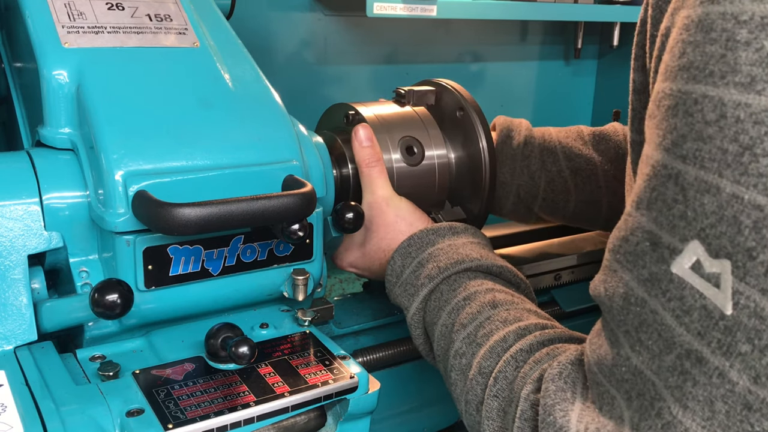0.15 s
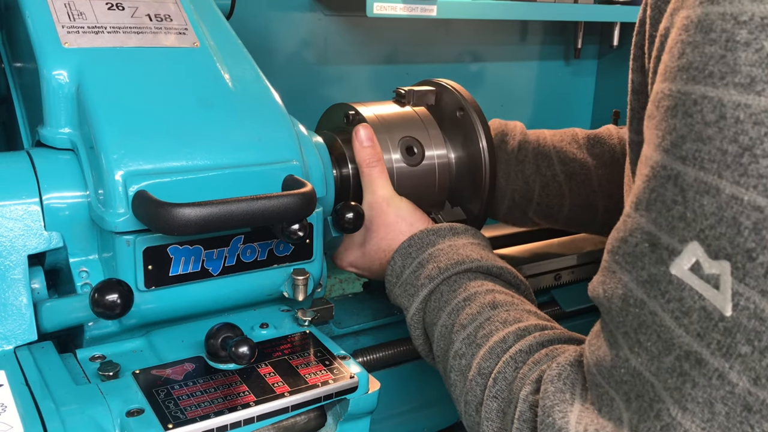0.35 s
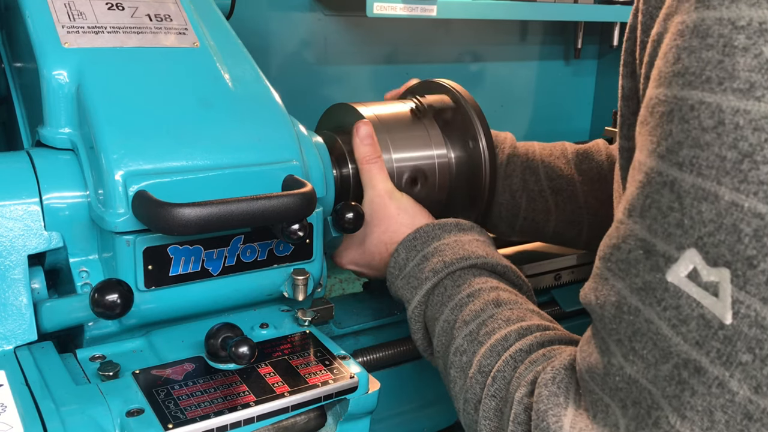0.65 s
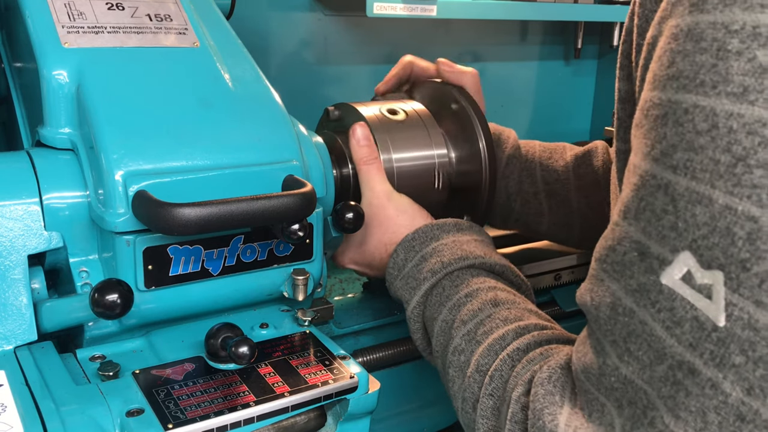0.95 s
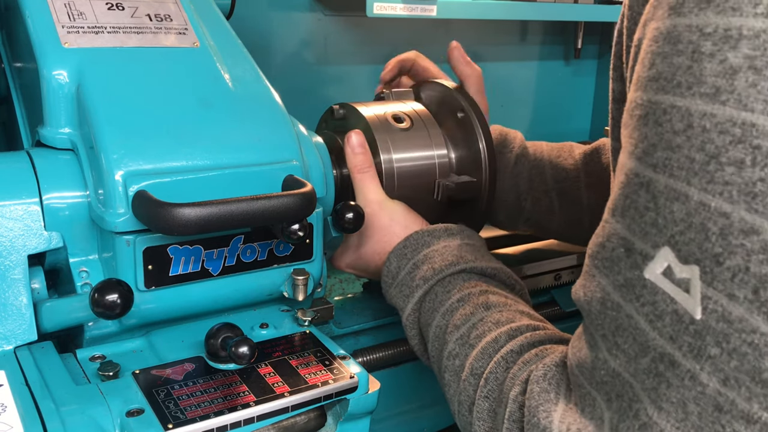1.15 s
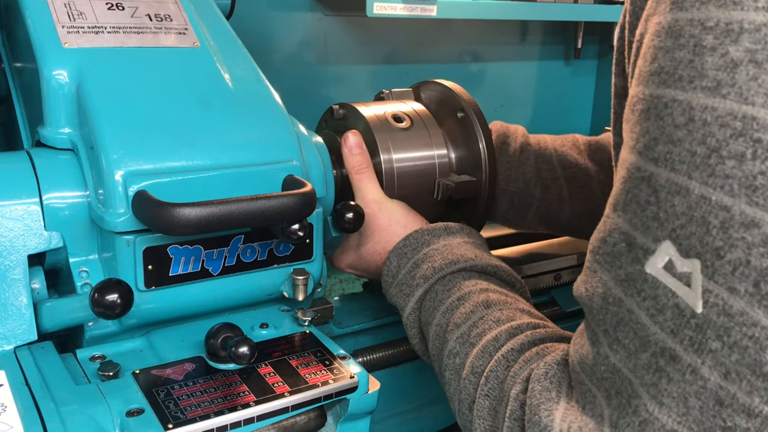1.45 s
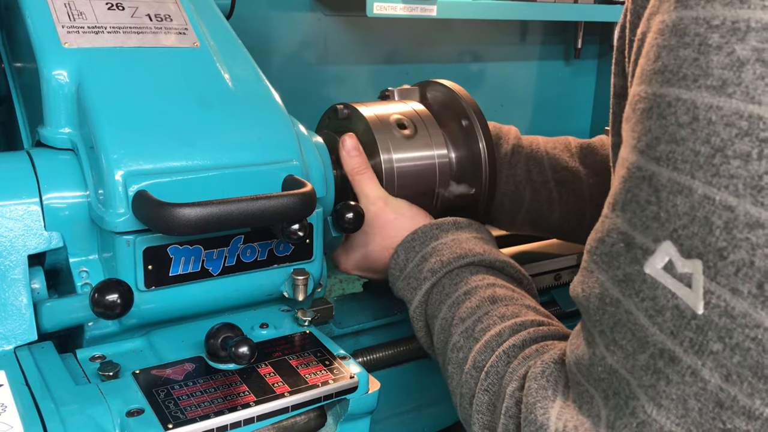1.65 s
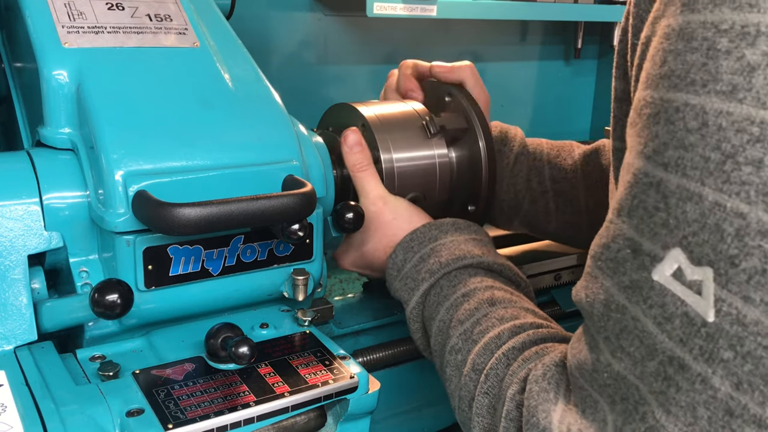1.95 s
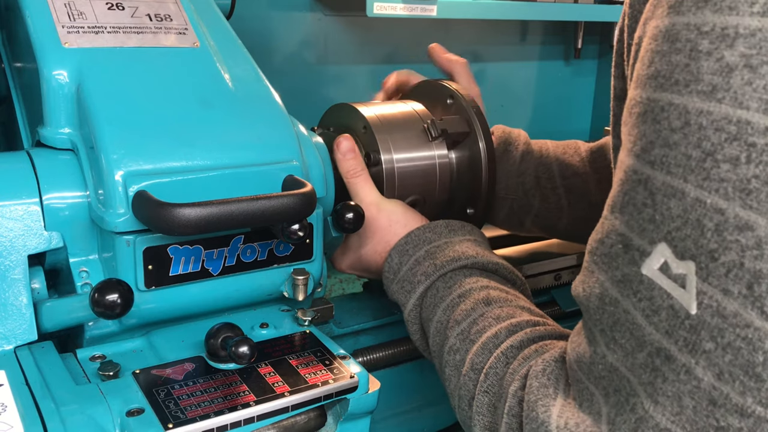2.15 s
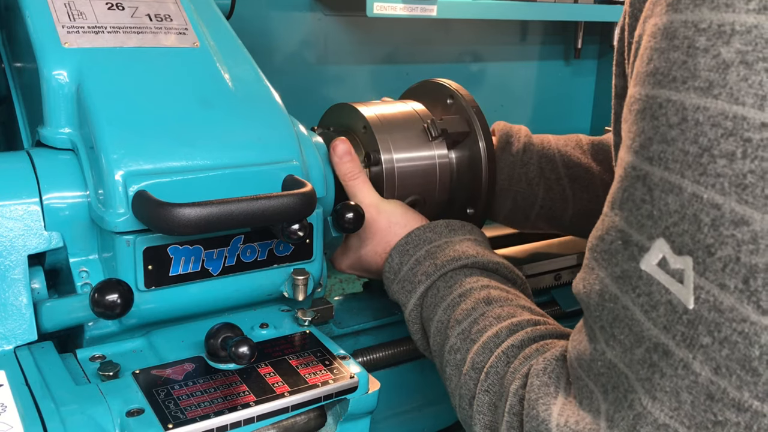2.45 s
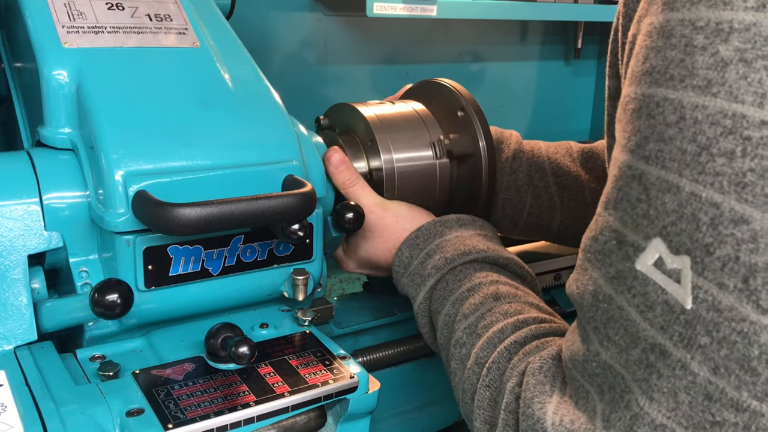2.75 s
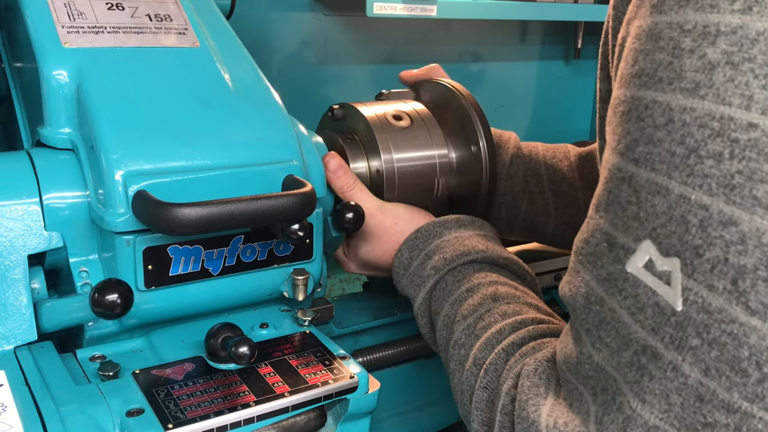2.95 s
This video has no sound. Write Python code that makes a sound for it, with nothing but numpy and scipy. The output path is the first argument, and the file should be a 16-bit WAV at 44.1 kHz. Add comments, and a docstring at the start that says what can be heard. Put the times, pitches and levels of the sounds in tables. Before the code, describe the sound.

Irregular metal knocks and clicks come from a lathe chuck being turned loose by hand, close by in a small workshop. The thread rubs softly between them, and past the middle comes the heaviest clunk, with a low bench boom.

```python
"""In a small workshop, a heavy steel chuck (a lathe's clamp) is unscrewed by hand from its spindle.
Each shove takes up the slack: the bench thumps, the cast metal parts knock, the chuck's jaws click
and the locking lever clinks. Each struck part rings with its own fading tones.
In between, the screw thread and a sleeve rub softly, over quiet room noise and a fluttering hiss."""
import sys
import numpy as np
from scipy import signal
from scipy.fft import rfft, irfft
from scipy.io import wavfile
from scipy.ndimage import uniform_filter1d

SR = 44100
rng = np.random.default_rng(int(sys.argv[2]) if len(sys.argv) > 2 else 0)


def int16_out(signal):
    """Quantize to a 16-bit WAV file."""
    q = np.round(np.clip(np.atleast_2d(signal).T, -1, 1) * 32767)
    wavfile.write(sys.argv[1], SR, q.astype(np.int16))


N = 136710
T = np.arange(N) / SR


def gain(db):
    """Turn decibels into a number to multiply by."""
    return 10 ** (np.asarray(db) / 20)


def unit(x):
    """Scale a sound to an average power of 1."""
    return x / np.sqrt(np.mean(x ** 2))


def look_up(hz, table, column=1):
    """Read between the rows of a table, with frequency counted in octaves."""
    table = np.array(table, float)
    return np.interp(np.log(hz + 1e-9), np.log(table[:, 0]), table[:, column])


def loudness(table):
    """Join (t/s, level/dB) points into a volume curve."""
    return gain(np.interp(T, *np.array(table).T))


def colour(x, table):
    """Balance low and high sound by (f/Hz, level/dB) points, at a power of 1."""
    weights = gain(look_up(np.fft.rfftfreq(N, 1 / SR), table))
    return unit(irfft(rfft(x) * weights, N))


def add(out, start, x):
    """Mix x in from a start time in seconds."""
    i = max(int(start * SR), 0)
    out[i:i + len(x)] += x[:N - i]


def ring(tones, t, shape=lambda hz: 1):
    """Tones start up and down in turn, scaled by shape(hz); fade is the time to drop 60 dB."""
    return np.sqrt(2) * sum((-1) ** k * gain(db - 60 * t / fade) * shape(hz) * np.sin(2 * np.pi * hz * t)
                            for k, (hz, db, fade) in enumerate(tones))


def wash_bands(table, count=20):
    """A wash is many tones too close to tell apart: make it as noise bands of (hz, fade, sound)."""
    edges = np.geomspace(table[0][0], table[-1][0], count + 1)
    centres = np.sqrt(edges[1:] * edges[:-1])
    weights = gain(look_up(centres, table)) * np.sqrt(np.diff(edges))
    weights /= np.linalg.norm(weights)
    f = np.fft.rfftfreq(N, 1 / SR)
    noise = rfft(rng.standard_normal(N))
    return [(hz, look_up(hz, table, column=2), weight * unit(irfft(noise * ((f >= lo) & (f < hi)), N)))
            for hz, weight, lo, hi in zip(centres, weights, edges, edges[1:])]


def wash(bands, t, shape=lambda hz: 1):
    """Let the noise bands fade after one hit, each scaled by shape(hz)."""
    i = rng.integers(N - len(t))
    return sum(x[i:i + len(t)] * gain(-60 * t / fade) * shape(hz) for hz, fade, x in bands)


def grainy(depth):
    """Noise whose level catches and slips every few milliseconds."""
    noise = rng.standard_normal(N)
    wobble = unit(uniform_filter1d(rng.standard_normal(N), size=300))
    return noise * np.exp(depth * np.tanh(wobble))


# Tone colour of the room noise: f/Hz, level/dB
ROOM_COLOUR = [(15, -52), (25, -2.5), (107, 2), (152, -9.5), (227, -17.5), (297, -11.5), (457, -17.5),
               (666, -14.5), (945, -20.5), (1660, -23.5), (2230, -26.5), (4380, -28), (4750, -32),
               (6380, -28.5), (7700, -32), (13500, -27), (15500, -39.5)]
def room_noise(level_db=-63):
    """The room has a quiet, steady rumble."""
    return gain(level_db) * colour(rng.standard_normal(N), ROOM_COLOUR)


# Tone colour of the hiss: f/Hz, level/dB
HISS_COLOUR = [(3000, -32), (6500, -13), (7800, -21), (9800, -9), (10800, -14.5), (11800, -6.5),
               (12400, 0.5), (13050, -13), (13750, 1.5), (14300, -8), (15500, -12)]
def hiss(level_db=-75.5, rate_hz=29.95, spread_db=1.8, jitter_s=0.0058, width_s=0.0048):
    """A thin hiss flutters in short, uneven puffs."""
    flutter = np.zeros(N)
    puff = np.exp(-.5 * (T[:int(6 * width_s * SR)] / width_s - 3) ** 2)
    for k, (late, size) in enumerate(rng.standard_normal((int(T[-1] * rate_hz) + 1, 2))):
        start = min(k / rate_hz + late * jitter_s, T[-1])
        add(flutter, start, gain(size * spread_db) * puff)
    return gain(level_db) * unit(flutter * colour(rng.standard_normal(N), HISS_COLOUR))


# How loudly the thread rubs: t/s, level/dB
THREAD_LEVELS = [(0, -66.5), (.5, -67), (.63, -56.5), (.85, -51.5), (1.05, -63), (1.25, -66.5), (1.42, -64),
                 (1.51, -56), (1.62, -61), (1.8, -52.5), (1.95, -49), (2.2, -59), (2.58, -62), (2.72, -53),
                 (2.82, -57), (2.97, -53), (3.1, -54)]
# Tone colour of that rubbing: f/Hz, level/dB
FRICTION_COLOUR = [(35, -21), (70, 11), (140, -4.5), (290, 1.5), (480, -10), (800, -18), (1500, -24.5),
                   (2500, -36.5), (6000, -43)]
# Tones of the cast metal parts, also heard in the knocks: f/Hz, level/dB, fade/s
CASTING_TONES = [(183.5, -5.5, 0.65), (218.6, -10.5, 0.5), (265.36, 0, .42), (296.7, -6.5, 0.44),
                 (382, -7, 0.43), (415, -8, 0.4), (538, -13.5, 0.43), (651, -6.5, 0.25), (708, -8.5, 0.46),
                 (787, -6.5, 0.25), (840, -8.5, 0.23), (889.4, -4.5, 0.37), (974, -8, 0.41),
                 (1042, -9, 0.5), (1082, -9.5, 0.42), (1142, -9.5, .28), (1251, -2.5, 0.26),
                 (1663, -14.5, 0.13), (1860, -16, 0.13)]
def thread_rubbing(ring_db=-11):
    """The screw thread catches and slips, which makes the cast metal ring softly."""
    friction = colour(grainy(depth=0.34), FRICTION_COLOUR)
    metal = unit(signal.fftconvolve(friction, ring(CASTING_TONES, T[:SR]))[:N])
    return loudness(THREAD_LEVELS) * (friction + gain(ring_db) * metal)


# How loudly sleeve and palm brush: t/s, level/dB
BRUSH_LEVELS = [(0, -74), (1.53, -76), (1.61, -65), (1.85, -65.5), (1.93, -71), (2.18, -66), (2.42, -79.5),
                (2.85, -78), (2.99, -64.5), (3.1, -75)]
# Tone colour of that brushing: f/Hz, level/dB
BRUSH_COLOUR = [(400, 4), (1400, 0), (2500, -2), (3800, -8.5), (6000, -10.5), (9000, -10), (15000, -10)]
def sleeve_brushing():
    """Cloth and skin slide over the chuck."""
    return loudness(BRUSH_LEVELS) * colour(grainy(depth=0.33), BRUSH_COLOUR)


# Thumps of the bench: t/s, level/dB, pitch multiplier
BENCH_HITS = [(0.109, -59, 1), (0.698, -49.5, 1.1), (0.743, -50, 1.07), (0.881, -56, 0.95),
              (1.009, -51.5, 1.1), (1.102, -50, 0.99), (1.188, -55.5, 0.81), (1.492, -40, 1.04),
              (1.586, -43, 1.18), (1.732, -39.5, 1.23), (1.793, -46, 1.15), (1.919, -52, 1.15),
              (2.023, -29.5, 1), (2.12, -36.5, 0.95), (2.86, -50.5, 1)]
# Tones of the bench, before that multiplier: f/Hz, level/dB, fade/s
BENCH_TONES = [(59.34, -14.5, 1.9), (65.8, -14, 1.1), (75.3, 1.5, 0.4), (101.2, -6.5, 0.55),
               (116.1, -9, .3)]
def bench_thumps(rise_s=0.014):
    """The machine's weight rocks the bench, which booms on."""
    out = np.zeros(N)
    swell = 1 - np.exp(-T / rise_s)
    for start, db, pitch in BENCH_HITS:
        boom = sum(gain(tone_db - 60 * T / fade) * np.sin(2 * np.pi * hz * pitch * T)
                   for hz, tone_db, fade in BENCH_TONES)
        add(out, start, gain(db) * np.sqrt(2) * boom * swell)
    return out


# Knocks of the spindle: t/s, level/dB, dull above f/Hz, bass boost/dB, rise/s, hand damping/(dB/s)
SPINDLE_HITS = [(.178, -63, 2600, -25, 0.00043, 108), (.457, -66, 2100, 7, 0.0007, 103),
                (.538, -62, 1820, 0, 0.00077, 60), (0.586, -66, 700, -7, 0.0047, 34),
                (.656, -59, 350, 10, 0.0026, 65), (0.671, -50.5, 1260, 5.5, 0.00048, 47),
                (0.684, -43, 830, 7.5, 0.00072, 106), (1.02, -64.5, 497, 13, 0.0018, 56),
                (1.639, -67, 900, 16, 0.003, 30), (1.688, -49.5, 750, 7, 0.0019, 26),
                (1.706, -50.5, 484, 15.5, 0.0016, 37), (1.886, -56.5, 800, 13.5, .004, 22),
                (1.965, -56.5, 1170, 9, 0.0048, 11), (2.0125, -34, 1830, -4, 0.0007, 44),
                (2.029, -41, 1080, 10, 0.00085, 1), (2.677, -59.5, 1244, 3, 0.00027, 145),
                (2.755, -64, 800, 15, .003, 45), (2.842, -50.5, 1260, 5.5, 0.0018, 49),
                (2.857, -47.5, 810, 3, 0.0006, 104), (2.925, -54.5, 790, 2.5, .003, 30),
                (3.0745, -55, 1280, -5, 0.00027, 900)]
# Crowded tones between the main casting tones: f/Hz, level/dB, fade/s
CASTING_NOISE = [(111.5, -12, 1), (183, 5.5, 1), (299, 3, .45), (480, -2.5, 0.64), (920, 0.5, 0.53),
                 (1320, -3, 0.32), (1740, 0, .2), (2380, -15, 0.42), (4980, -11, 0.26)]
def spindle_knocks(tones_db=-6.5, wash_db=-0.5, bass_hz=510, lag_cycles=0.33, impact_s=0.0074):
    """Blows ring the cast metal; soft contact dulls it, low tones build late, the grip damps it."""
    out, t, bands = np.zeros(N), T[:SR * 3 // 4], wash_bands(CASTING_NOISE)
    impact = 1 + gain(-10) * np.exp(-t / impact_s)
    for start, db, dull_hz, bass_db, rise_s, damping in SPINDLE_HITS:
        def shape(hz):
            bass = 1 / (1 + (hz / bass_hz) ** 4)  # near 1 for low tones, 0 for high ones
            dulling = 1 / np.sqrt(1 + (hz / dull_hz) ** 7)
            swell = 1 - np.exp(-t / (rise_s + bass * lag_cycles / hz))
            return gain(bass_db * bass) * dulling * swell
        metal = gain(tones_db) * ring(CASTING_TONES, t, shape) + gain(wash_db) * wash(bands, t, shape)
        add(out, start, gain(db - damping * t) * impact * metal)
    return out


# Clicks of the jaws: t/s, level/dB, favoured f/Hz, spread/octaves, ring level/dB
JAW_HITS = [(.179, -60.5, 2270, 1.34, -18), (.5365, -60, 2240, 0.77, -9.5),
            (.8638, -44.5, 2100, 0.64, -6.5), (0.8716, -47, 2120, 0.58, -8), (1.574, -64, 2980, 0.2, -2.5),
            (1.7316, -50, 2460, 0.88, -3), (1.7388, -49.5, 2820, 0.095, 12.5),
            (1.9735, -61.5, 2460, 0.29, -3.5), (2.017, -47, 2880, 0.77, -11),
            (2.738, -45.5, 2060, 0.37, -9), (2.7601, -61.5, 2370, 0.052, 8)]
# Clear tones of the jaws: f/Hz, level/dB, fade/s
JAW_TONES = [(1390, 1, 0.08), (1706, -1, 0.075), (1953, -1.5, 0.049), (2110, -4.5, 0.16),
             (2173, -7.5, 0.04), (2270, -8.5, 0.11), (2390, -8.5, 0.1), (2662, -2, 0.083), (2900, -13, .08),
             (3256, -3, 0.095), (3480, -26, 0.093)]
# Crowded tones of the jaws: f/Hz, level/dB, fade/s
JAW_NOISE = [(285, -4, 0.48), (694, 18, 0.15), (1120, 0.5, 0.3), (1930, 3.5, 0.048), (3400, -2, 0.11),
             (4500, -16.5, 0.17), (7860, -9, 0.052)]
def jaw_clicks(crack_db=-1, crack_s=0.0044):
    """Steel hits steel: a crack and a short, bright ring."""
    out, t, bands = np.zeros(N), T[:SR // 2], wash_bands(JAW_NOISE)
    crack = 1 + gain(crack_db) * np.exp(-t / crack_s)
    for start, db, peak_hz, spread, ring_db in JAW_HITS:
        def shape(hz):
            return 1 / np.hypot(1, (np.log2(hz / peak_hz) / spread) ** 2)
        tones = gain(ring_db) * ring(JAW_TONES, t, shape) / np.sqrt(2)
        add(out, start, gain(db) * (crack * wash(bands, t, shape) + tones))
    return out


# Clinks of the locking lever: t/s, level/dB, tilt toward high tones/(dB/octave)
LEVER_HITS = [(.694, -49.5, 0), (.879, -57, -12.5), (1.582, -71, 12), (1.655, -62.5, 12),
              (1.866, -49.5, 2.5), (1.886, -51, -18), (1.964, -61, 3)]
# Clear tones of the lever: f/Hz, level/dB, fade/s
LEVER_TONES = [(729, -2, 0.12), (784, -2, 0.078), (1453, -5.5, 0.14), (1498, -10.5, 0.091)]
# Crowded tones of the lever: f/Hz, level/dB, fade/s
LEVER_NOISE = [(270, 2, 0.27), (520, 0, .2), (786, -1, 0.18), (1100, 4, .15), (1470, 5, 0.089),
               (1750, -12, 0.11), (2850, -17, .08)]
def lever_clinks(wash_db=-8, rise_s=0.0011, pivot_hz=1020):
    """The locking lever rattles and rings with two close pairs of tones."""
    out, t, bands = np.zeros(N), T[:SR // 2], wash_bands(LEVER_NOISE)
    swell = 1 - np.exp(-t / rise_s)
    for start, db, tilt in LEVER_HITS:
        tones = ring(LEVER_TONES, t, lambda hz: gain(tilt * np.log2(hz / pivot_hz)))
        add(out, start, gain(db) * (tones + gain(wash_db) * wash(bands, t)) * swell)
    return out


# Swishes of the sleeve: middle t/s, level/dB, half length/s
SWISHES = [(1.095, -67, 0.011), (1.663, -71, .02), (1.85, -72.5, .022), (2.96, -86, 0.027)]
# Tone colour of a swish: f/Hz, level/dB
SWISH_COLOUR = [(1500, 0), (3000, -1), (5500, 2), (7500, -11), (10000, -8), (15000, -16)]
def sleeve_swishes():
    """Cloth swishes briefly as the arm changes grip."""
    swell = sum(gain(db) * np.exp(-((T - middle) / half_s) ** 2) for middle, db, half_s in SWISHES)
    return swell * colour(grainy(depth=0.33), SWISH_COLOUR)


def wall_echo(x, echo_db=-9, fade_s=0.28, rise_s=0.0078):
    """Sound bounces off the near walls and gains a short, blurred tail."""
    t = T[:SR // 2]
    tail = rng.standard_normal(len(t)) * gain(-60 * t / fade_s) * (1 - np.exp(-t / rise_s))
    return x + gain(echo_db) * signal.fftconvolve(x, tail / np.linalg.norm(tail))[:N]


def scene():
    """Mix everything into one channel; only the clicks and clinks get the echo."""
    hits = bench_thumps() + spindle_knocks() + wall_echo(jaw_clicks() + lever_clinks())
    rubbing = thread_rubbing() + sleeve_brushing() + sleeve_swishes()
    return (hits + rubbing + room_noise() + hiss())[None]


def record(dry):
    """Cut off the highest treble."""
    top_hz = 15550
    return signal.sosfilt(signal.ellip(10, .2, 70, top_hz, fs=SR, output="sos"), dry)


dry = scene()
out = record(dry)
int16_out(out)
```